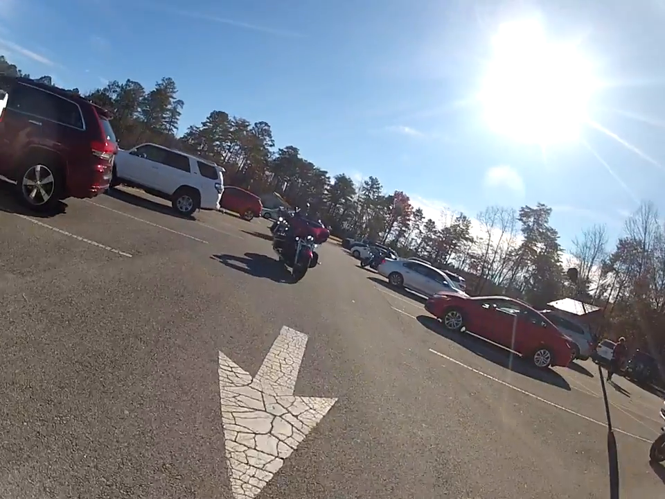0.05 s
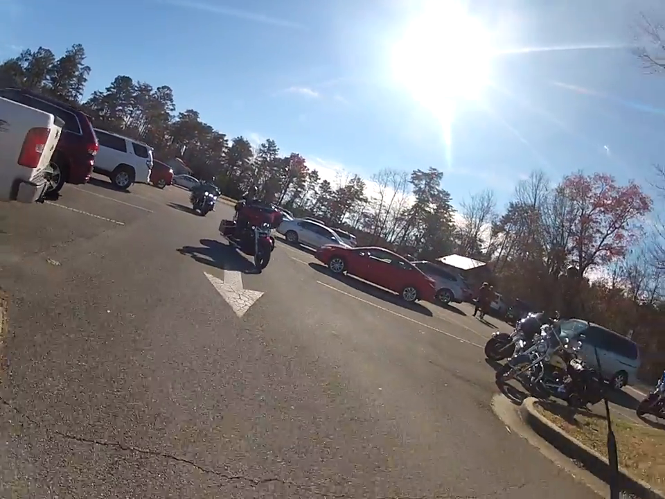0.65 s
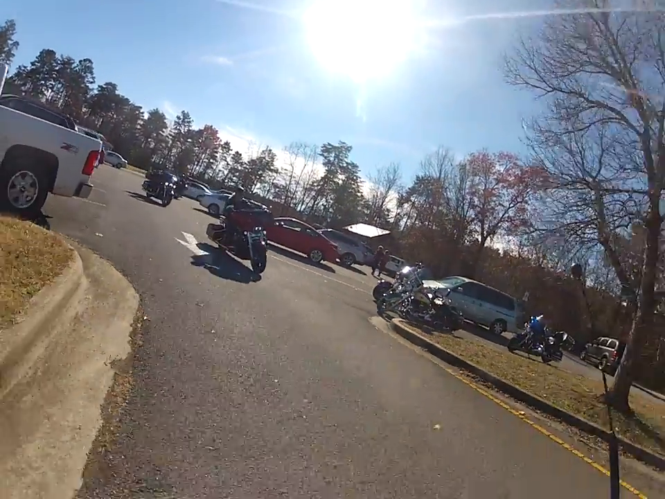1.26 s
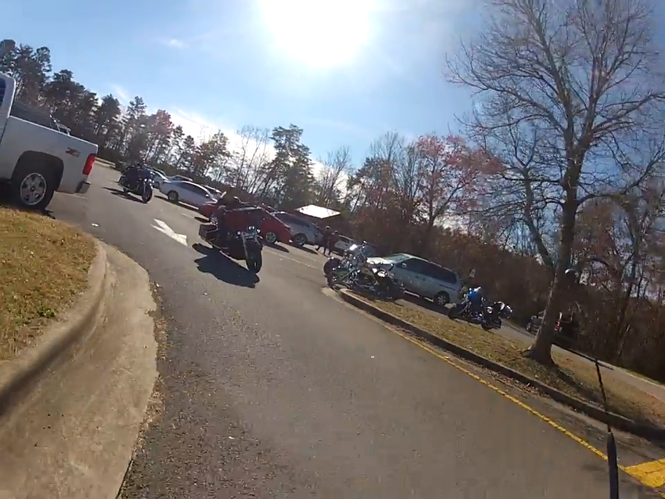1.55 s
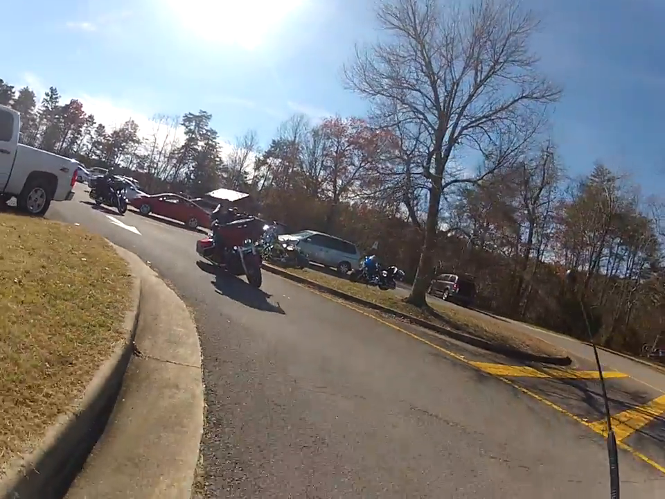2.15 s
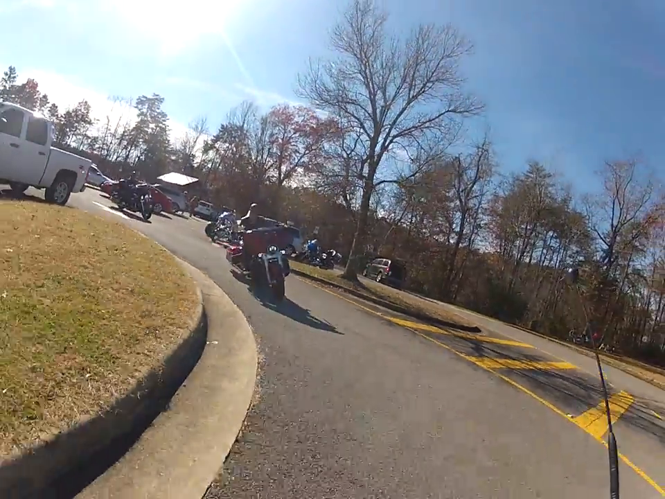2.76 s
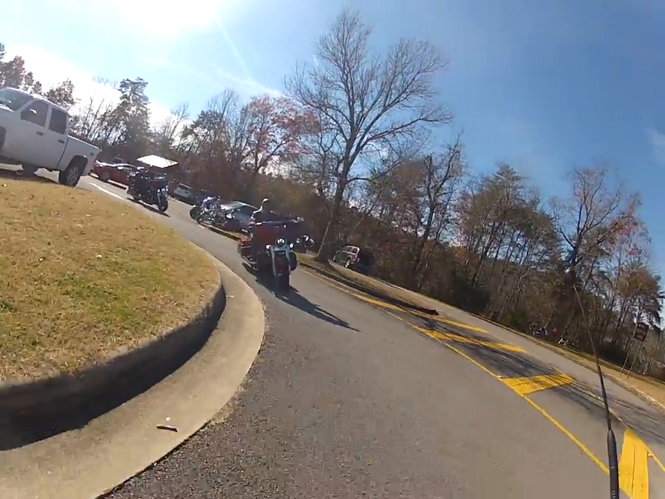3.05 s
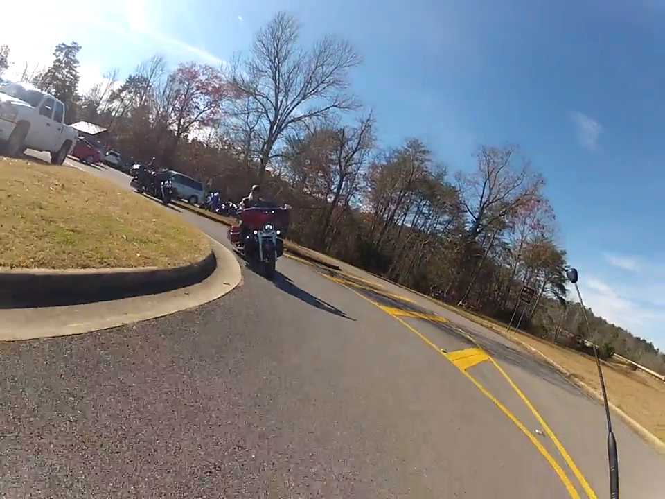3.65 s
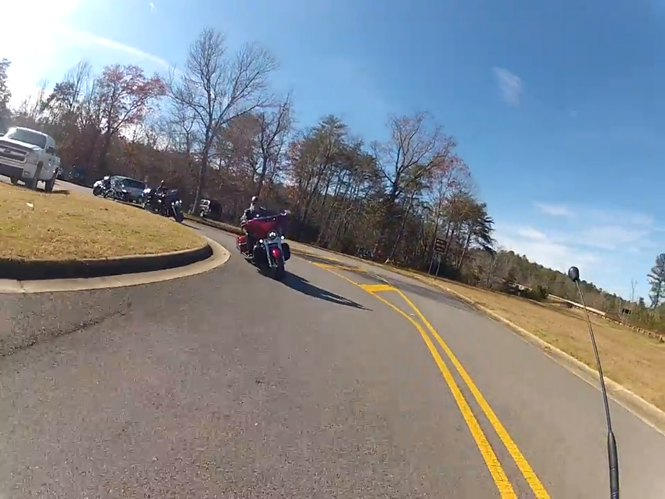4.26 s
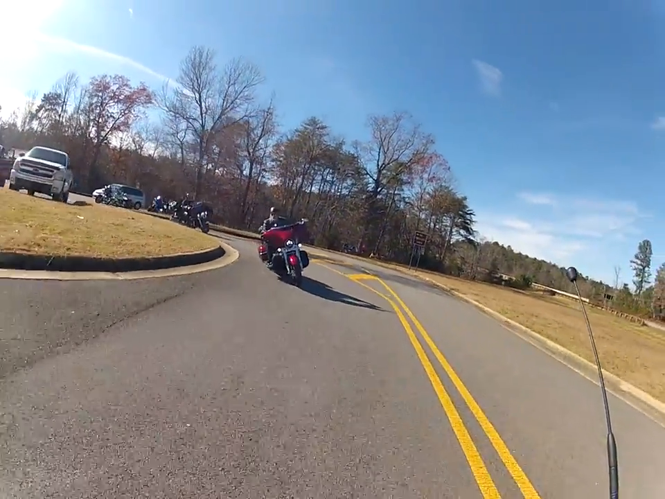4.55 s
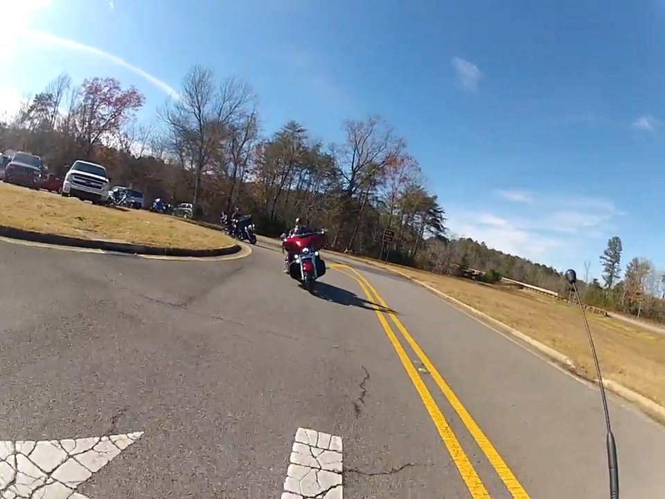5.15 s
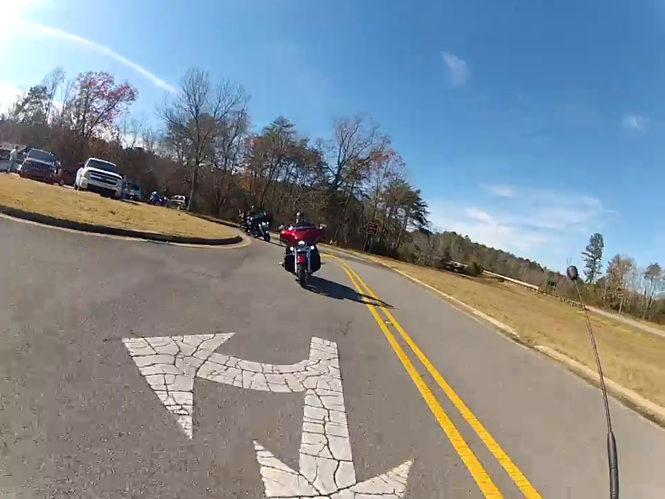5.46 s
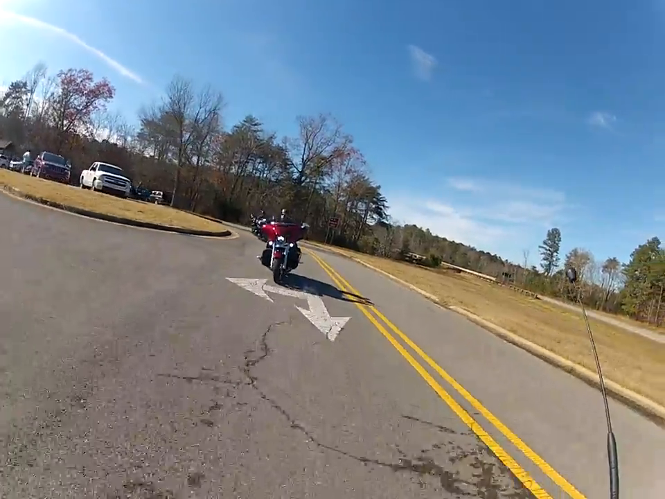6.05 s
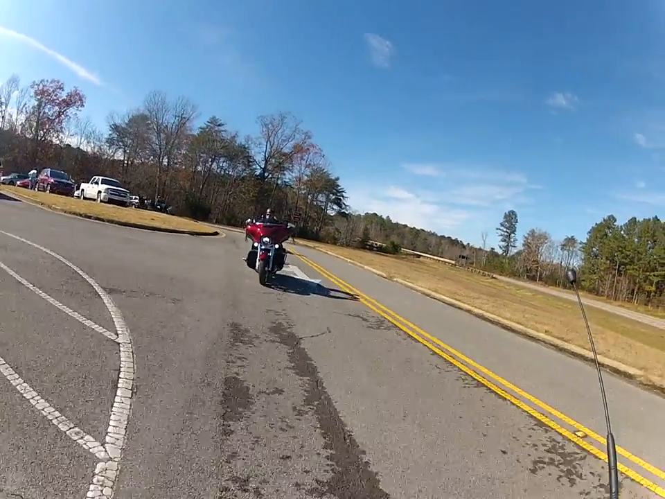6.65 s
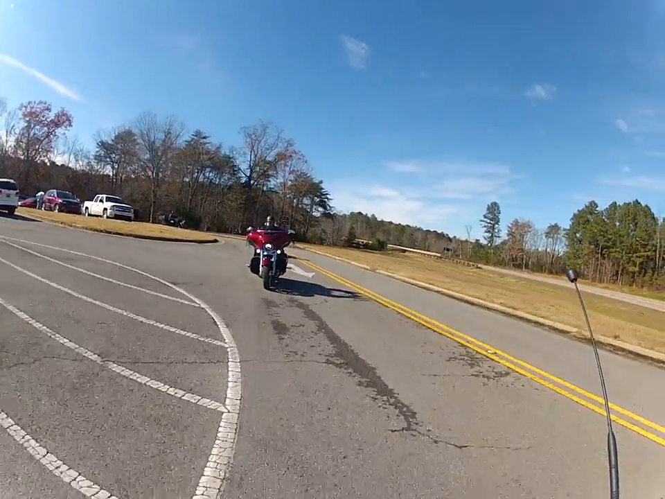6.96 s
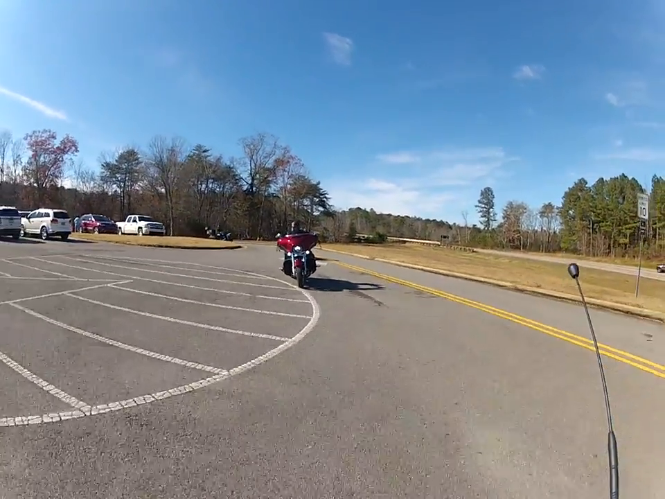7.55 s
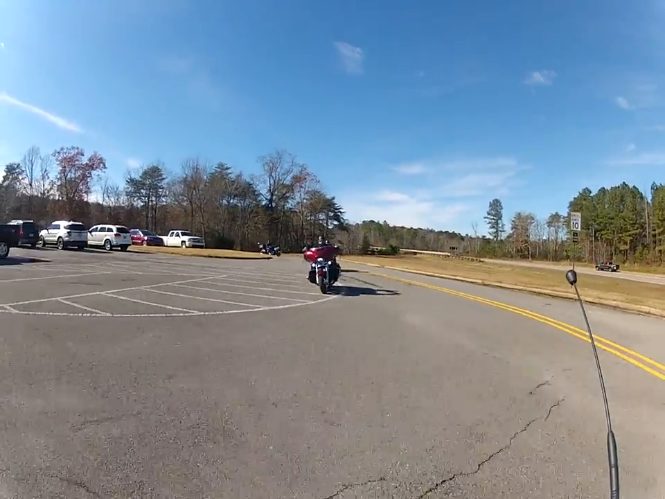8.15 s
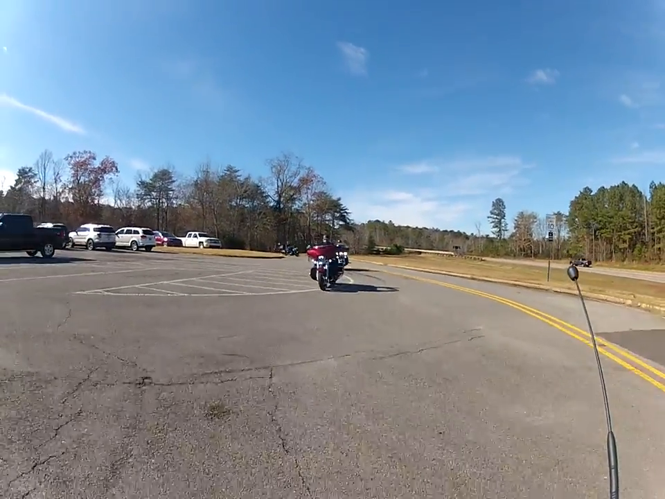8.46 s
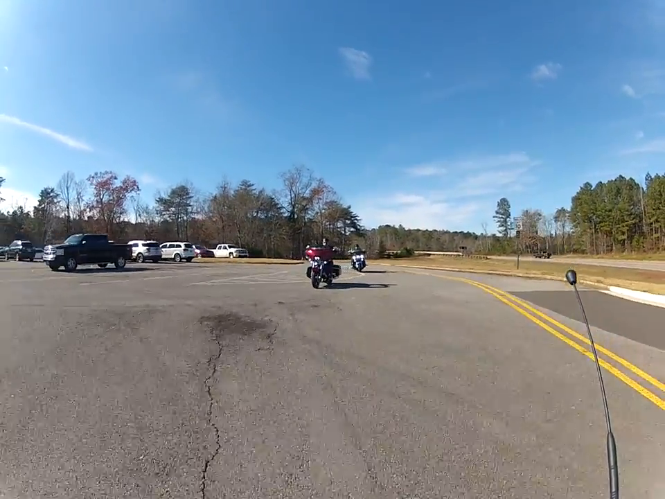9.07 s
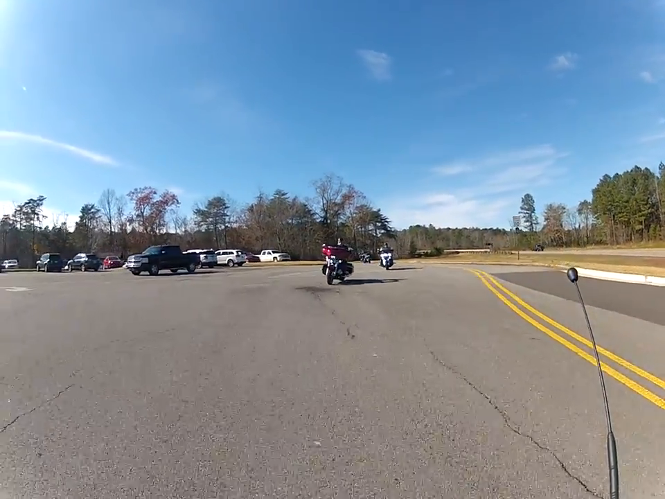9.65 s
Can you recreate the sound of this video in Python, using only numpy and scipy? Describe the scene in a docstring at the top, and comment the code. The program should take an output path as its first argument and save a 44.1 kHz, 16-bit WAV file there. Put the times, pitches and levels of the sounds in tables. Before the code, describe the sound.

Heard from on board, a deep, thumping motorcycle engine accelerates, backs off with exhaust pops, pulls once more and slows over low wind rumble.

```python
"""A big V-twin motorcycle idles, pulls hard, shifts, pulls again and rolls off, heard from the bike.
Two unevenly spaced firings ring the exhaust pipes; unburnt fuel pops as the throttle shuts.
Under them are valve clatter, a knocking panel, gear noise, brake and belt tones, wind and two other bikes.
A small camera limits and clips the loud beats, and its sampling adds a thin treble buzz."""
import sys
import numpy as np
from scipy import signal
from scipy.fft import rfft, irfft, next_fast_len
from scipy.io import wavfile
from scipy.ndimage import uniform_filter1d

SR = 44100
rng = np.random.default_rng(int(sys.argv[2]) if len(sys.argv) > 2 else 0)


def generate_wav(signal):
    """Clip the signal to [-1, 1] and save it as 16-bit WAV at the path in sys.argv[1]."""
    frames = np.transpose(np.atleast_2d(signal))
    scaled = np.clip(frames, -1, 1) * 32767
    pcm = np.round(scaled).astype(np.int16)
    wavfile.write(sys.argv[1], SR, pcm)


N = 432618
T = np.arange(N) / SR

# engine speed: time_s, four_stroke_cycles_per_s
ENGINE_SPEED = [(0.0, 7.19), (1.86, 7.19), (2.19, 11.69), (2.84, 12.47), (3.59, 15.37), (4.26, 17.08),
                (4.51, 15.05), (4.85, 10.27), (5.3, 10.99), (5.69, 10.85), (6.6, 11.51), (7.5, 12.58),
                (8.18, 13.35), (8.61, 9.12), (8.95, 8.59), (9.81, 8.14)]


def exhaust(cycles):
    """The front cylinder fires, then the rear; each firing rings its pipe and blows a puff of gas."""
    # pipe modes at 12 cycles/s: pitch_hz, t60_s, signed_gain
    front_modes = [(50.75, 0.39, -0.223), (116.1, 0.16, -0.39), (126.74, 0.067, 1.74),
                   (158.9, 0.069, -0.71), (190.2, 0.17, 0.44), (235.6, 0.15, 0.071)]
    rear_modes = [(52.96, 0.27, -0.27), (74.4, 0.067, 0.4), (101.4, 0.12, 0.51), (140.4, 0.14, 0.17),
                  (219, 0.15, 0.088)]
    # gas rush spectrum: freq_hz, relative_db
    gas_spectrum = [(100, 7), (220, 2.5), (350, -5), (700, -11), (950, -16.5), (1180, -12.5), (1400, -23),
                    (1850, -20.5), (3000, -30), (4500, -40.5), (6000, -66)]
    rear_lag_cycles, rear_extra_path_s, puff_s = .402, 0.001976, 0.021
    speed = curve(ENGINE_SPEED) / 12
    push = amp(1.416 * (throttle_db() + 9.5) + 0.68) / np.sqrt(speed)
    stumble = np.clip(.8 - push, 0, 1)  # a light throttle burns unevenly
    uneven = cycles + (.002 + .015 * stumble) * drift(25)
    strength = push * amp(2.1 * stumble * drift(22))
    front = strength * clicks(uneven, spread_db=0.23)
    rear = strength * delay(clicks(uneven - rear_lag_cycles, spread_db=1.2), rear_extra_path_s)
    front_wave = front + 0.5 * delay(front, .0132)  # reflected at the closed valve
    rear_wave = rear - 0.21 * delay(rear, .0057)  # reflected, inverted, at the open end
    pipes = hot_pipe(blowdown(front_wave, push), front_modes, speed)
    pipes += hot_pipe(blowdown(rear_wave, push), rear_modes, speed)
    flow = fade(fade(push * (front_wave + 0.54 * rear), puff_s), 0.0015)
    puffs = (.8 * flow + .15 * push ** 2) * amp(2.6 * drift(45)) * noise()
    return pipes + amp(-30) * colour(puffs, gas_spectrum)


def throttle_db():
    """Exhaust drive: each pull opens, holds and shuts into a dying overrun."""
    # throttle pulls: open_s, shut_s, rise_s, drive_db, creep_db_per_s
    pulls = [(.25, 1.7, 0.4, -18, 0.5), (1.98, 4.39, 0.2, -9.5, 0.47), (4.5, 8.25, 1.62, -10, 0.42)]
    shut_db, close_s, overrun_db, overrun_s = -21., 0.073, -13.5, 0.61
    level_db = np.full(N, shut_db)
    for open_s, shut_s, rise_s, drive_db, creep_db_per_s in pulls:
        from_middle_s = np.minimum(T, shut_s) - (open_s + shut_s) / 2
        held = drive_db + creep_db_per_s * from_middle_s - shut_db
        after_s = np.maximum(T - shut_s, 0)
        opening = np.clip((T - open_s) / rise_s, 0, 1) ** 0.47
        closing = held * np.exp(-after_s / close_s)
        overrun = np.minimum(held, overrun_db - shut_db) * np.exp(-(after_s / overrun_s) ** 2)
        level_db = np.maximum(level_db, shut_db + opening * np.maximum(closing, overrun))
    return level_db


def blowdown(firings, push):
    """A closed throttle rounds each pulse; an open one leaves it sharp."""
    valve_open_s, rounding_s = 0.00031, 0.0018
    sharpness = np.clip(push, 0, 1)
    sharp = fade(firings, valve_open_s) / (valve_open_s * SR)
    rounded = fade(sharp, rounding_s) / (rounding_s * SR)
    return 1.02 * sharpness * sharp + 2.38 * (1 - sharpness) * rounded


def hot_pipe(pulses, modes, speed):
    """Gas heats with engine speed, so the pipe rings higher, on a faster clock."""
    clock_s = np.cumsum(speed ** 0.074) / SR
    ringing = ring(np.interp(T, clock_s, pulses, right=0), modes)
    return np.interp(clock_s, T, ringing)


def pops():
    """Unburnt fuel fires in the pipe: a narrow pressure hump in a wide dip, with a turbulent crack."""
    # exhaust pops: centre_s, level_db
    bangs = [(4.4521, 6), (4.479, 7.5), (4.545, 5), (4.6149, 1), (4.692, 3.5), (4.776, 2.5), (4.869, -2.5),
             (8.2859, 8), (8.368, 1.5), (8.458, 0), (8.557, 2)]
    crack_spectrum = [(200, -26), (450, 22), (1000, 0.5), (3000, -14), (5500, -23.5), (8000, -63)]
    hump_s = 0.001995
    hump, crack = np.zeros(N), np.zeros(N)
    for centre_s, level_db in bangs:
        near = abs(T - centre_s) < .04
        u = (T[near] - centre_s) / hump_s
        hump[near] += amp(level_db) * (1.48 * np.exp(-u ** 2) - 0.47 * np.exp(-(u / 7.6) ** 2))
        crack[near] += amp(level_db / 2) / (1 + (u / 1.9) ** 4)
    return hump + amp(-25.5) * crack * colour(noise(), crack_spectrum)


def idle_thumps():
    """Heavy idle beats of a twin close by, each one low pipe note."""
    # idle beats: start_s, peak_db
    beats = [(.1, -16), (.511, -15), (.666, -13.5), (.795, -12), (1.049, -9.5), (1.205, -11), (1.33, -12),
             (1.485, -11.5), (1.765, -12), (1.902, -17)]
    out, t = np.zeros(N), T[:SR // 6]
    for start_s, peak_db in beats:
        pitch_hz = 122 * (1 + 0.049 * rng.standard_normal())
        out[round(start_s * SR):][:len(t)] += amp(peak_db) * tone_burst(t, pitch_hz, rise_s=.016)
    return out


def clatter(cycles):
    """Valves and chain tick four times a cycle, in the dull casing and as a bright hiss."""
    # clatter swell: time_s, gain_db
    swell = [(0, -3), (2.1, 0), (4.6, 1), (5.45, 2.5), (7.1, -1), (8.4, -3), (9.81, -4.5)]
    # noise spectra: freq_hz, relative_db
    casing_spectrum = [(150, -21.5), (250, 0), (340, 2), (480, -1.5), (660, -2.5), (790, -12), (950, -18.5),
                       (1200, -26), (1800, -59)]
    hiss_spectrum = [(600, -11.5), (1000, -8.5), (1170, 4), (1330, -3), (1750, 1.5), (2400, -2.5),
                     (2950, 3.5), (3500, -10), (4600, -8.5), (5300, -15.5), (6100, -32), (7300, -11.5),
                     (8500, -18.5), (10000, -38)]
    ticks = clicks(4 * cycles + 0.024 * drift(60), spread_db=6)
    knock = (1 + 0.14 * unit(fade(ticks, 0.0037))) * noise()
    hiss = (1 + 0.071 * unit(fade(ticks, 0.0046))) * noise() * amp(1.25 * drift(90))
    swell_db = curve(swell)
    casing = amp(-30.5 + 0.56 * swell_db) * colour(knock, casing_spectrum)
    return casing + amp(-44.5 + swell_db) * colour(hiss, hiss_spectrum)


def panel_knocks():
    """A loose panel knocks hollowly at low revs, rebounding once each time."""
    # knocks: start_s, peak_db
    hits = [(1.359, -21.5), (1.417, -18), (1.474, -18.5), (1.533, -16), (1.593, -15), (1.656, -14),
            (1.721, -12), (1.934, -20)]
    rebound_s, rebound_db = .037, -6
    out, t = np.zeros(N), T[:SR // 20]
    for start_s, peak_db in hits:
        for at_s, level_db in (start_s, peak_db), (start_s + rebound_s, peak_db + rebound_db):
            pitch_hz = 609 * (1 + 0.029 * rng.standard_normal())
            out[round(at_s * SR):][:len(t)] += amp(level_db) * tone_burst(t, pitch_hz, rise_s=0.0028)
    return out


def gearbox_rasps():
    """Clutch and gearbox grind in brief metallic swells."""
    # rasps: centre_s, level_db, half_width_s
    rasps = [(2.263, -26, 0.015), (4.636, -30, 0.0087), (5.457, -35, 0.054)]
    spectrum = [(200, -17), (600, 15), (1500, -3), (2900, 1), (3500, -8), (4100, -11), (5400, -16),
                (6200, -40), (7500, -16), (10000, -27)]
    swell = sum(amp(level_db) * bump(centre_s, half_s) for centre_s, level_db, half_s in rasps)
    return swell * colour(noise(), spectrum)


def lever_clinks():
    """Light blows ring the gear lever."""
    # blows: start_s, level_db
    taps = [(8.28, -39), (8.507, -38.5), (8.548, -36)]
    # lever modes: pitch_hz, t60_s, gain
    modes = [(3950, .04, 0.54), (4250, .03, 0.44), (8102, .045, 0.27)]
    blows = np.zeros(N)
    for start_s, level_db in taps:
        blows[round(start_s * SR)] = amp(level_db)
    return ring(blows, modes)


def final_drive():
    """Two fuzzy tones of belt and tyre tread climb with road speed."""
    # road speed as a reference pitch: time_s, pitch_hz
    road = [(5.0, 594.8), (8.15, 701), (9.81, 714)]
    start_s, rise_s = 4.8, .6
    tones = np.zeros(N)
    for ratio, gain_db in (0.98, -1), (.84, 2.5):
        pitch_hz = ratio * curve(road) * (1 + 0.01503 * drift(90))
        tones += amp(gain_db + 2.8 * drift(12)) * sine(pitch_hz)
    return amp(-41.5) * np.clip((T - start_s) / rise_s, 0, 1) * tones


def brake_squeal():
    """A pad sings and sags in pitch; on release it touches once a wheel turn, then fades."""
    sag_hz_per_s, wheel_hz, off_s, fade_db_per_s = 75, 4.3, 1.6, 50
    pitch_hz = (1708 - sag_hz_per_s * T) * (1 + 0.0049 * drift(120))
    released = np.clip((T - .45) / 0.38, 0, .85)
    touch = 1 - released * np.sin(np.pi * wheel_hz * (T - .95)) ** 2
    level_db = -48.5 + drift(18) + 2.1 * (.5 - released)
    fade_db = fade_db_per_s * np.maximum(T - off_s, 0)
    return amp(level_db - fade_db) * touch * sine(pitch_hz)


def wind():
    """Lumpy rumble of air and road."""
    # rumble spectrum: freq_hz, relative_db
    spectrum = [(8, -25.5), (22, -17.5), (40, 3.5), (70, -4.5), (115, -0.5), (170, -8), (260, -12),
                (400, -31.5), (900, -80)]
    return amp(-22.7 + 1.2 * drift(7)) * colour(noise(), spectrum)


def bike_ahead():
    """A second twin fires at its own speed, thinned by distance."""
    pipe_modes = [(71.4, 0.078, -0.085), (120.3, 0.2, 1.0), (231.6, 0.086, 0.59), (360, 0.11, 0.21)]
    cycles = np.cumsum(11.5 * (1 + .03 * drift(1.3))) / SR
    firings = clicks(cycles, spread_db=3.5) + clicks(cycles - .44, spread_db=-1.5)
    return amp(-30) * unit(ring(firings, pipe_modes))


def parked_bike():
    """Dull clatter and valve hiss swell and fade as a bike at the kerb is passed."""
    hiss_spectrum = [(1500, -24), (2300, -6), (2900, 3.5), (3500, -8), (4100, -8), (5500, -13),
                     (6200, -45.5)]
    body_spectrum = [(150, -18), (300, -3.5), (550, 2.5), (720, -0.5), (950, -34.5), (1800, -54)]
    hiss = amp(-46) * colour(noise(), hiss_spectrum)
    body = amp(-33) * colour(noise(), body_spectrum)
    return bump(centre_s=1.35, half_width_s=0.51, power=2) * (hiss + body)


def hums():
    """Hollow, wavering tones swell and fade under the clatter."""
    # hums: centre_s, level_db, half_width_s, pitch_hz
    swells = [(0.704, -42, 0.95, 385), (.82, -35, 0.11, 531), (5.9, -39, .65, 495)]
    out = np.zeros(N)
    for centre_s, level_db, half_width_s, pitch_hz in swells:
        tone = sine(pitch_hz * (1 + .02 * drift(70) + .025 * drift(4)))
        out += amp(level_db + 4.6 * drift(20)) * bump(centre_s, half_width_s) * tone
    return out


def amp(db):
    return 10 ** (np.asarray(db) / 20)


def unit(x):
    """Scales to rms 1."""
    return x / np.sqrt(np.mean(x ** 2) + 1e-20)


def noise():
    return rng.standard_normal(N)


def sine(pitch_hz):
    """Tone following a per-sample pitch."""
    return np.sin(2 * np.pi * np.cumsum(pitch_hz) / SR)


def tone_burst(t, pitch_hz, rise_s):
    """Tone that swells for rise_s, then dies."""
    u = t / rise_s
    return u * np.exp(1 - u) * np.sin(2 * np.pi * pitch_hz * t)


def bump(centre_s, half_width_s, power=4):
    """Bell-shaped envelope, peak 1."""
    return 1 / (1 + ((T - centre_s) / half_width_s) ** power)


def curve(rows):
    """Interpolates (time_s, value) rows at every sample."""
    return np.interp(T, *np.transpose(rows))


def colour(x, spectrum):
    """Filters x by (freq_hz, relative_db) rows, to rms 1."""
    freq_hz, relative_db = np.transpose(spectrum)
    size = next_fast_len(N)
    bins_hz = np.fft.rfftfreq(size, 1 / SR)
    gain = amp(np.interp(np.log(bins_hz + 1), np.log(freq_hz), relative_db))
    return unit(irfft(rfft(x, size) * gain, size)[:N])


def drift(rate_hz):
    """Smooth random wander, rms 1."""
    knots = rng.standard_normal(4000)
    return unit(np.interp(T * rate_hz, np.arange(len(knots)), knots))


def clicks(cycles, spread_db):
    """One click of random size per cycle."""
    at = np.flatnonzero(np.diff(np.floor(cycles)) > 0)
    out = np.zeros(N)
    out[at] = amp(spread_db * rng.standard_normal(2000)[:len(at)])
    return out


def fade(x, decay_s):
    """Gives each click an exponential tail."""
    return signal.lfilter([1], [1, -np.exp(-1 / (decay_s * SR))], x)


def ring(x, modes):
    """x excites damped (pitch_hz, t60_s, gain) modes."""
    t = T[:SR // 3]
    response = sum(gain * np.sin(2 * np.pi * hz * t) * 1000 ** (-t / t60_s) for hz, t60_s, gain in modes)
    return signal.oaconvolve(x, response)[:N]


def delay(x, delay_s):
    return np.interp(T - delay_s, T, x, left=0)


def limit(x, threshold_db, recovery_db_per_s):
    """Gain drops just after each peak over the threshold, then climbs back."""
    fall_db = T * recovery_db_per_s
    peak_db = np.maximum.accumulate(20 * np.log10(abs(x) + 1e-9) + fall_db) - fall_db
    over_db = uniform_filter1d(np.maximum(peak_db - threshold_db, 0), size=200)
    return x / amp(delay(over_db, 0.0042))


def scene():
    """Mono mix as heard on the bike."""
    cycles = .31 + np.cumsum(curve(ENGINE_SPEED)) / SR
    engine = exhaust(cycles) + clatter(cycles) + pops()
    chassis = final_drive() + brake_squeal() + panel_knocks() + gearbox_rasps() + lever_clinks()
    around = wind() + bike_ahead() + parked_bike() + hums() + idle_thumps()
    return (engine + chassis + around)[None]


def record(dry):
    """Bass cut, limiter, hard clip, sampling wobble and band limit."""
    bass_cut_hz, wobble_s, wobble_hz, band_edge_hz = 12, 3.1e-5, 12000, 15150
    x = signal.lfilter(*signal.butter(1, bass_cut_hz, "high", fs=SR), dry[0])
    x = limit(x, threshold_db=.3, recovery_db_per_s=130)
    x = np.clip(x, -.708, .708)
    x += wobble_s * SR * np.gradient(x) * np.sin(2 * np.pi * wobble_hz * T)  # images around wobble_hz
    lowpass = signal.firwin(401, band_edge_hz, window=("kaiser", 9), fs=SR)
    return signal.oaconvolve(x, lowpass, "same")[None]


dry = scene()
out = record(dry)
generate_wav(out)
```